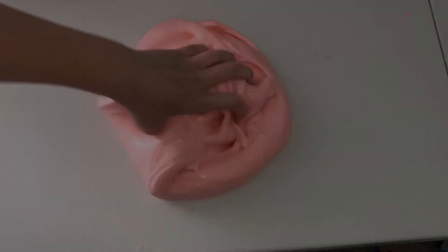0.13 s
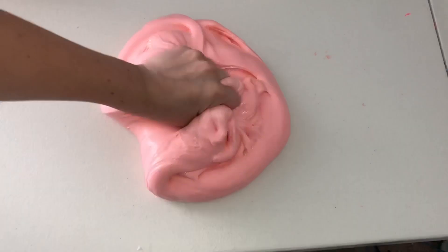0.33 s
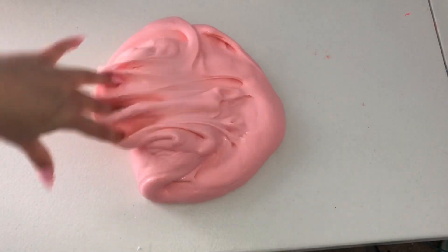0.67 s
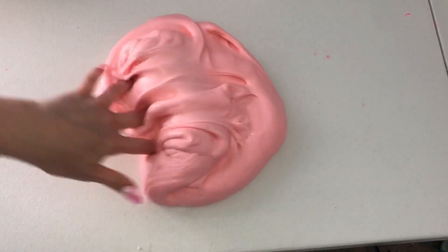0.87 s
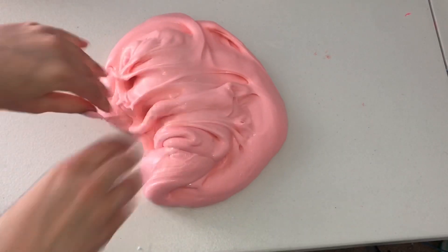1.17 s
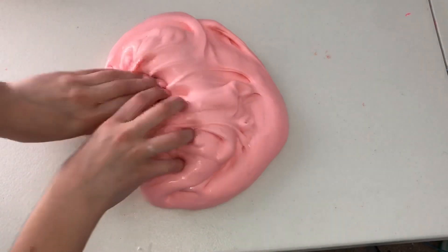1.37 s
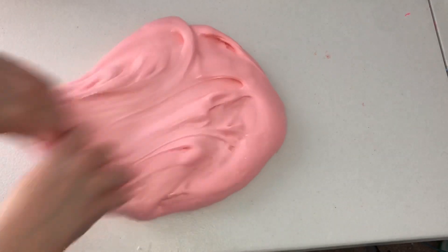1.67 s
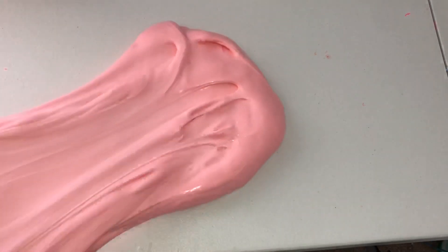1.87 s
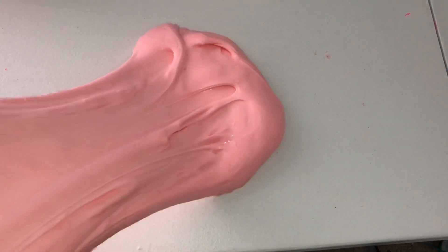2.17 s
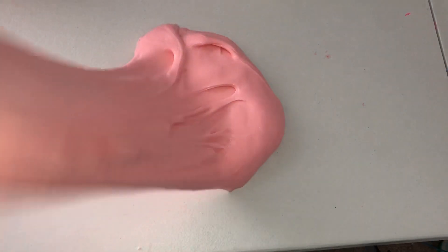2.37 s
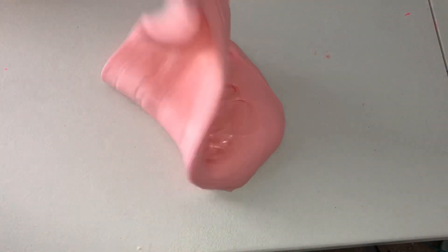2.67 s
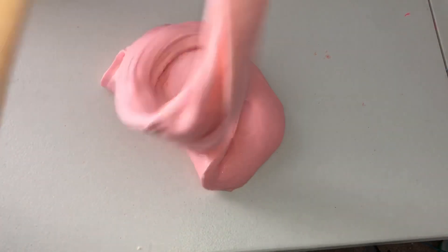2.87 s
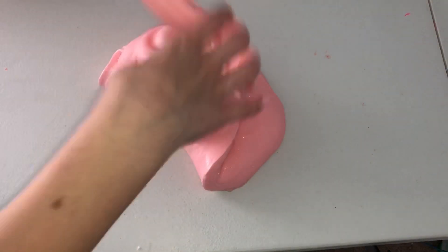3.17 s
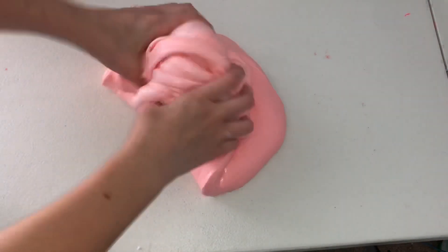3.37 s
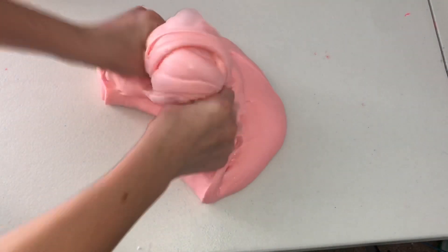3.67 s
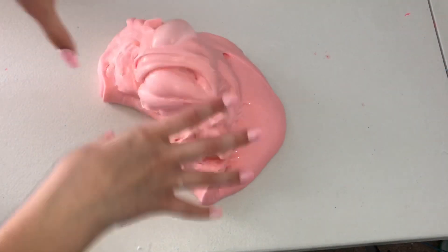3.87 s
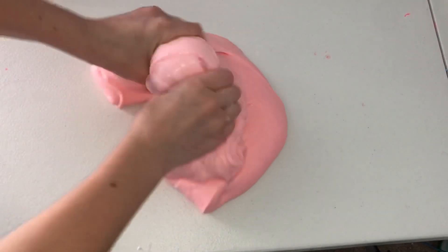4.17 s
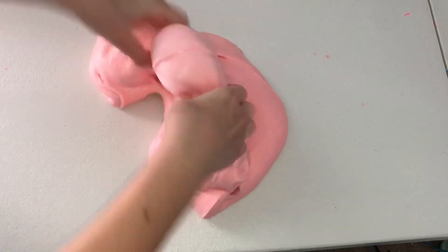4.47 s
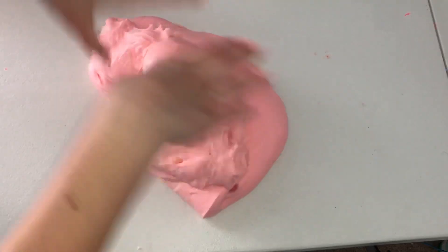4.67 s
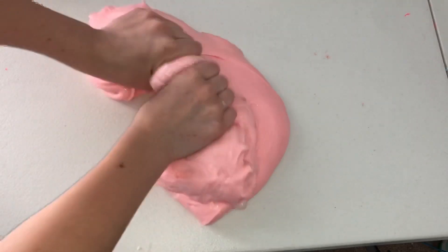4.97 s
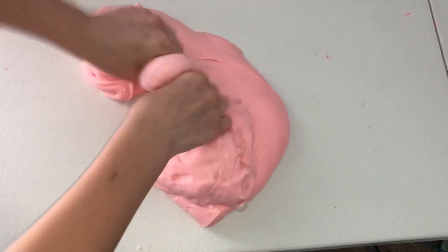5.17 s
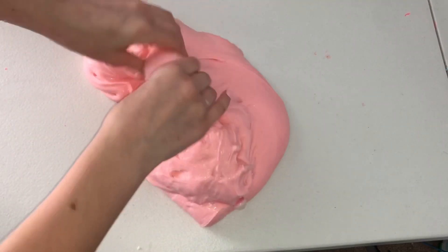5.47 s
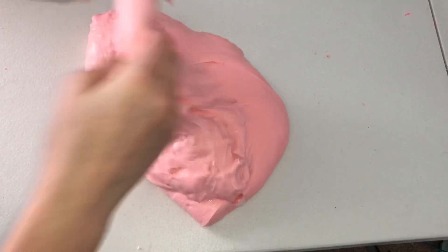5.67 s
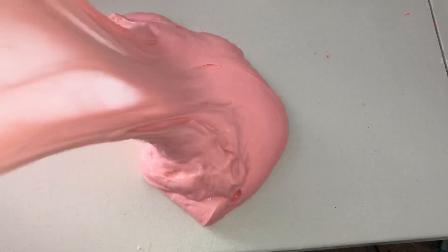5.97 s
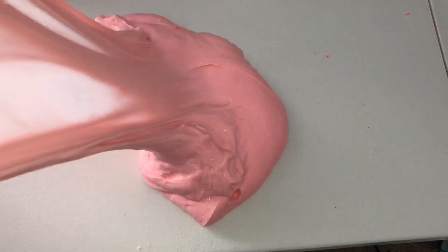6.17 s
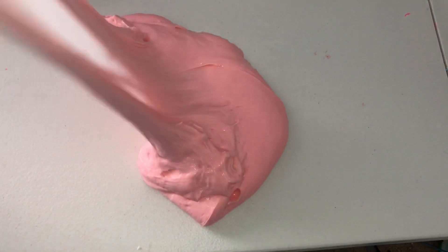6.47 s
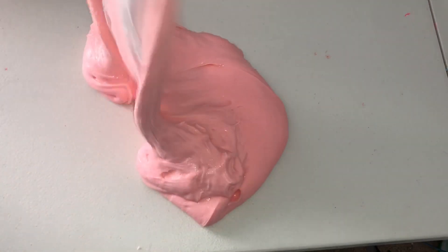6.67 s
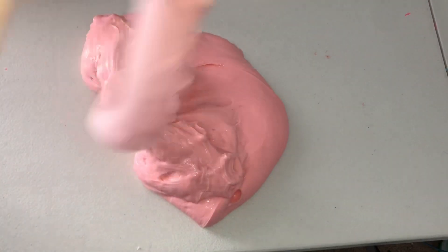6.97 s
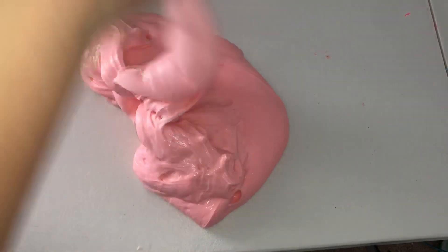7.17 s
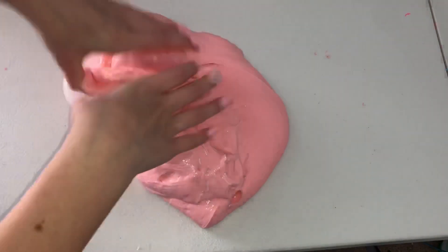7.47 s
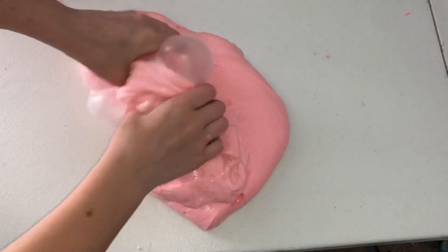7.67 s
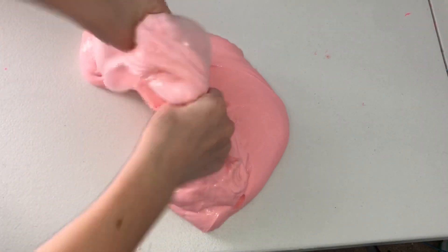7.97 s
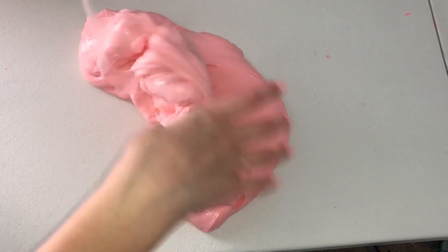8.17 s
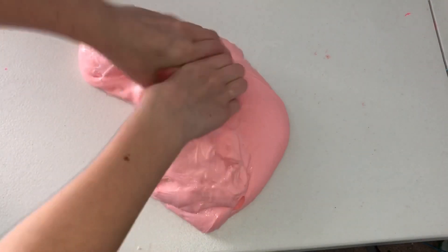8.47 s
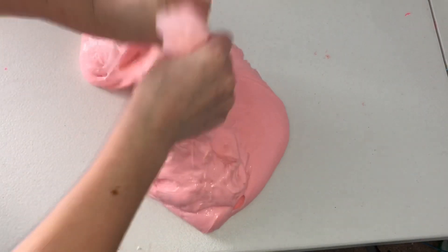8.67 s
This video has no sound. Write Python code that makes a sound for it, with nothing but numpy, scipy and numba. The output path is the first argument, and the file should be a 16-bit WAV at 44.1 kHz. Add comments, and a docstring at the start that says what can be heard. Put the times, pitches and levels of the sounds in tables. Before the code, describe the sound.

In a small quiet room, hands press and stretch foamy slime on a table, close to the microphone. Scattered small pops and soft squishes come first, then a sharp snap and a dense run of sticky crackles with dull thuds. The sound nearly stops while the slime is pulled, then two more clusters of loud pops follow. Faint room air and a low hum lie underneath.

```python
"""In a small quiet room, hands knead and stretch foamy slime on a table, close to a phone.
Trapped air pockets burst and ring as damped resonators, and the many tiny cells of the squeezed
foam add up to a crackle. Pushes excite the modes of the table top, and the slime squeaks once, faintly.
Table and walls reflect the bursts and thumps over faint room air, a hum and a drone;
the phone delays the bass more than the treble."""
import sys
import numpy as np
from scipy import signal
from scipy.fft import rfft, irfft, next_fast_len
from scipy.io import wavfile
from scipy.ndimage import uniform_filter1d
from numba import njit

SR = 44100
rng = np.random.default_rng(int(sys.argv[2]) if len(sys.argv) > 2 else 0)


def dump_mix(stems):
    """Bounce the given channels to the path in sys.argv[1] as a 16-bit WAV at rate SR."""
    frames = np.atleast_2d(stems).T  # one column per channel
    limited = np.clip(frames, -1, 1)  # hard clip at full scale
    pcm = np.round(limited * 32767).astype(np.int16)
    wavfile.write(sys.argv[1], SR, pcm)


N = 388962
T = np.arange(N) / SR


# Bursting air pockets: (time [s], peak level [dB], pitch [Hz], snap level [dB], blow level [dB])
POCKETS = [(0.258, -28, 5540, -53, -47), (0.313, -23.5, 6700, -44, -52), (0.346, -8, 9900, -35, -42),
           (0.391, -21, 9040.0, -35, -47), (0.455, -36, 6120, -39, -59), (0.48, -47, 9100, -18.5, -48),
           (0.569, -35.5, 1570, -34, -39), (0.785, -45, 9740.0, -38, -62), (0.864, -25, 6450, -53, -46),
           (0.994, -40.5, 3970, -63, -54), (1.156, -26, 3700.0, -30.5, -27), (1.411, -29, 2570.0, -37, -35),
           (1.432, -23.5, 3150, -33, -35.5), (1.624, -24.5, 3700, -46, -62), (2.066, -48, 5600, -42.5, -67),
           (2.29, -37.5, 4070.0, -61, -64), (2.334, -50, 5980.0, -38.5, -54),
           (2.366, -49.5, 1200, -52, -85), (2.606, -37.5, 2110, -44, -42), (2.718, -41, 3040.0, -38, -72),
           (2.841, -23, 1210, -28.5, -33), (2.878, -24, 1220, -41, -33.5), (3.177, -40, 1150, -70, -54),
           (3.314, -31.5, 1600, -36.5, -46), (3.335, -32, 1100, -52, -54), (3.427, -33.5, 1200, -47, -40),
           (3.483, -33, 9050.0, -33, -43), (3.534, -2, 1070, -13.5, -24), (3.581, -34, 1320.0, -24, -40),
           (3.601, 8, 5470, -1.5, -29), (3.603, 2.5, 7960, -18, -56), (3.697, -39, 4760.0, -33, -64),
           (3.719, -39, 1470, -55, -58), (3.796, -25, 3800, -56, -30), (3.838, -24, 1560, -43, -33),
           (3.93, -31.5, 4330, -37, -58), (3.992, -40.5, 3610.0, -38.5, -54),
           (4.052, -44.5, 5030, -49.5, -63), (4.163, -37, 8320.0, -38, -53.5),
           (4.194, -17.5, 9550.0, -21, -40), (4.24, -16.5, 2350, -31, -34), (4.268, -2, 5830, -31, -26.5),
           (4.312, 2.5, 2300, -3, -14), (4.351, -5.5, 6350, -14, -20), (4.358, -13, 1190, -13, -56),
           (4.381, -12, 4580.0, -11.5, -27), (4.426, -22, 10900.0, -14.5, -57),
           (4.488, -30, 3420, -35, -60), (4.513, -27, 5000, -37, -55), (4.544, -22.5, 2850, -39, -54),
           (4.666, -31.5, 4570, -40.5, -46), (4.813, -16, 11200, -19, -50),
           (4.913, -20.5, 3600, -34.5, -35), (4.957, -30, 3500.0, -38, -45), (4.98, -7.5, 1820, -37, -32),
           (4.99, -23, 1980.0, -16.5, -35), (5.013, -9.5, 2480, -14.5, -20.5), (5.03, -10, 6200, -18, -43),
           (5.043, 8, 2240, -12, -13), (5.063, -1, 6060, -10, -40), (5.117, -9, 6440.0, -23, -34),
           (5.127, -22, 5260.0, -36, -47.5), (5.149, -4, 6720, -42, -58), (5.174, -15.5, 6340.0, -26, -58),
           (5.182, -20, 7350.0, -26, -52), (5.19, -21, 8650.0, -9.5, -52), (5.272, -19, 3320.0, -28, -36),
           (5.356, -29.5, 1200, -35, -44), (5.517, -37.5, 2460, -38, -67.5),
           (5.559, -31, 9400.0, -29, -47.5), (5.595, -38.5, 8840.0, -38, -57),
           (5.834, -30.5, 9900, -52, -57), (5.899, -36, 3530, -29.5, -65.5),
           (6.077, -42.5, 1126, -39, -49.5), (6.392, -44.5, 2760, -53.5, -47),
           (6.767, -19.5, 1550, -29.5, -42.5), (6.857, -33.5, 1680.0, -39, -50.5),
           (6.888, -39.5, 1410.0, -59, -60), (6.997, -38.5, 1156, -46.5, -54),
           (7.009, -34, 1887, -53.5, -51), (7.025, -32.5, 4400, -47.5, -51),
           (7.325, -44.5, 1225, -59.5, -59.5), (7.408, -52, 1306, -58, -65),
           (7.463, -50.5, 1103, -57.5, -65), (7.654, -48, 2220, -45, -59.5), (7.788, -35, 3090, -41, -47.5),
           (7.855, 0.5, 2520, -15.5, -19), (7.868, -0.5, 7350, -31, -22), (7.888, -4.5, 4670, -20, -38),
           (7.923, -4.5, 5770, -17, -30), (7.94, -20, 1100, -45, -27.5), (7.951, -15, 10600.0, -16, -36),
           (7.988, -21, 10900.0, -27, -66), (8.006, -19, 11000, -28, -63), (8.061, -26.5, 6390.0, -31, -45),
           (8.158, -26, 8840, -29.5, -54), (8.365, -36, 6900, -47.5, -53.5), (8.545, -45, 3980, -48, -60),
           (8.564, -25.5, 4040, -45, -42.5), (8.595, -9.5, 1370, -26.5, -31), (8.604, 1, 1550, -48, -15),
           (8.615, -28, 2589, -20, -41), (8.639, -9.5, 2800.0, -34, -36), (8.641, -3, 1360, -50, -11),
           (8.684, -21.5, 1690, -37, -32), (8.74, -17, 9200, -17.5, -33), (8.795, -30.5, 1110, -38, -47),
           (8.801, -11, 11300.0, -25, -54)]
def pops(travel_s=.0016):
    """Cavity resonance: a bursting pocket rings, its skin snaps and the blow enters the table."""
    time, db, hz, snap_db, blow_db = np.transpose(POCKETS)
    onset = samples(time + travel_s)
    chance = rng.random((len(time), 32)).T
    # Smaller pockets and gentler bursts ring for more cycles.
    ring_cycles = .21 * (hz / 3000) ** .25 * 2 ** (-(db + 20.5) / 60)
    bursts = grains(onset, hz, ring_cycles, db)
    bursts += grains(onset, hz, cycles=1.1, db=db - 16)  # the emptied pocket rings on
    for k, (late, pitch) in enumerate(chance[:8].reshape(4, 2, -1)):
        tear = onset + samples(min(k, 1) * late * .003)  # the skin tears raggedly
        bursts += grains(tear, hz=5500 + 7000 * pitch, cycles=.31, db=snap_db - k)
    # Weaker cells nearby follow, each at its own pitch.
    for late, pitch, softness in chance[8:].reshape(8, 3, -1):
        cell_hz = np.minimum(hz * 2 ** (2.2 * pitch - .8), .35 * SR)
        cell_db = db - 12 - 15 * late - 6 * softness
        bursts += grains(onset + samples(late * .014), cell_hz, cycles=.39, db=cell_db)
    blow = grains(onset, hz=360, cycles=.24, db=blow_db)
    bass_cut = signal.butter(4, 110, "high", fs=SR, output="sos")  # soft slime radiates no deep bass
    return signal.sosfilt(bass_cut, bursts + .3 * blow + table_top(blow))


def foam(count, lo_hz, hi_hz, scatter_db):
    """Shot noise: tiny cells burst at random times, most weakly, a few strongly."""
    when, pitch, chance = rng.random((count, 3)).T
    hz = lo_hz * (hi_hz / lo_hz) ** pitch
    cells = grains((when * N).astype(np.int64), hz, cycles=.41, db=-scatter_db * np.log(1 - chance))
    return level(cells, 0)


# Gentle pulling and folding: (time [s], crackle level [dB])
HANDLING = [(0, -98), (0.27, -76), (0.75, -77), (1.3, -80), (1.9, -76), (2.5, -75), (3.1, -79.5),
            (4.0, -74.5), (4.75, -79), (5.45, -79.5), (6.0, -72.5), (6.3, -81), (6.7, -77.5), (7.2, -86.5),
            (8.4, -83), (8.82, -78)]
# Squeezes, silent unless the end follows the start:
# (start [s], fullest [s], end [s], crackle [dB], rasp [dB], fizz [dB], weight on the table [dB])
SQUEEZE_SWELLS = [(0.232, 0.29, 0.53, -66, -69, -66, -73), (0.502, 0.6, 0.7, -61, -58, -57.5, -56),
                  (1.115, 1.141, 1.27, -65, -59.5, -56, -48.5), (1.399, 1.44, 1.568, -50, -45.5, -57, -48),
                  (1.567, 1.66, 1.93, -63, -65, -66, -63.5), (2.583, 2.6, 3.04, -65, -73, -73, -71),
                  (2.767, 2.887, 2.94, -56.5, -61, -65, -56), (3.294, 3.49, 3.51, -59.5, -61, -64, -58.5),
                  (3.53, 3.623, 3.8, -56.5, -55, -52.5, -59), (3.76, 3.826, 3.97, -53.5, -51, -49.5, -49),
                  (4.163, 4.27, 4.3, -58.5, -61.5, -64, -62), (4.318, 4.322, 4.47, -41.5, -41, -36, -44.5),
                  (4.49, 4.54, 4.683, -55.5, -51.5, -49.5, -48.5),
                  (4.898, 5.065, 5.32, -56.5, -56.5, -66, -57), (5.224, 5.285, 5.4, -55, -53, -48.5, -51.5),
                  (5.52, 5.619, 5.97, -68, -74, -71.5, -67), (6.76, 6.846, 7, -68.5, -67, -70.5, -76),
                  (6.968, 7.022, 6.68, -58.5, -62, -63, -61), (7.614, 7.716, 7.9, -75.5, -75, -69.5, -70.5),
                  (7.844, 7.876, 8.04, -47.5, -46.5, -51, -64), (8.032, 8.086, 8.255, -56, -56, -52, -59),
                  (8.588, 8.61, 13, -53.5, -54.5, -48.5, -54), (8.672, 8.74, 8.67, -47, -47, -43, -50.5)]
def kneading():
    """Incoherent addition: handling and squeezes sum in power to drive the foam and the table."""
    db = np.interp(T, *np.transpose(HANDLING))
    power = undb([db, db, db + 1, -73 + .4 * (db + 75.5)]) ** 2
    for start, fullest, end, *peak_db in SQUEEZE_SWELLS:
        span = slice(int(start * SR), int(end * SR))
        swell = np.sin(np.pi / 2 * np.interp(T[span], [start, fullest, end], [0, 1, 0])) ** 1.59
        power[:, span] += (undb(peak_db)[:, None] * swell) ** 2
    crackle, rasp, fizz, weight = np.sqrt(power)
    patches = walk(60)  # the three foam bands flicker together
    crackle *= undb(4.6 * patches) * foam(count=14000, lo_hz=650, hi_hz=2300, scatter_db=2)
    rasp *= undb(2.9 * patches) * foam(count=18000, lo_hz=2620, hi_hz=5800, scatter_db=2.5)
    fizz *= undb(2.6 * patches) * foam(count=40000, lo_hz=5140, hi_hz=15500, scatter_db=3.5)
    shove = table_top(rng.standard_normal(N)) + .18 * band(rng.standard_normal(N), 150, 680)
    weight *= undb(3.6 * walk(29)) * level(shove, 0)
    return crackle + rasp + fizz + weight


# Modes of the table top: (frequency [Hz], bandwidth [Hz], gain [dB])
TABLE_MODES = [(153.3, 15, 9.5), (340, 84, -4), (421, 60, -1.5)]
def table_top(push):
    """Modal superposition: the response to a push is a sum of damped resonances."""
    return sum(undb(db) * band(push, hz - width / 2, hz + width / 2, order=1)
               for hz, width, db in TABLE_MODES)


# The heel of a hand lands through the slime: (time [s], level [dB])
HAND_LANDINGS = [(0.606, -38), (1.174, -26), (1.452, -54), (2.852, -40.5), (3.545, -27.5), (3.841, -35),
                 (4.326, -40.5), (4.577, -39.5), (4.912, -39.5), (5.051, -37.5), (5.306, -36),
                 (8.642, -38.5)]
def thuds():
    """Soft impact: a long push excites the table's lowest mode and rocks it on its legs."""
    time, db = np.transpose(HAND_LANDINGS)
    flexing = grains(samples(time), hz=TABLE_MODES[0][0], cycles=.74, db=db)
    rocking = grains(samples(time), hz=80, cycles=.56, db=db - 15)
    return flexing + rocking


def squeak(start_s=5.55, fullest_s=5.58, end_s=5.92, sag_hz_per_s=151.5):
    """Frequency modulation: pulled slime sounds a wavering, sagging tone and its subharmonic."""
    hz = 1110.5 - sag_hz_per_s * (T - start_s) + 16.1 * walk(32)
    phase = 2 * np.pi * np.cumsum(hz) / SR
    envelope = np.interp(T, [start_s, fullest_s, end_s], [0, 1, 0]) * undb(-73 + 3 * walk(25))
    return envelope * (np.sin(phase) + undb(2) * np.sin(phase / 2))


# Echoes from nearby surfaces: (delay [s], gain [dB])
REFLECTIONS = [(.0032, -15.5), (.0065, -26.5), (.0098, -24.5), (0.0121, -24.5)]
def room(sound, low_t60_s=.24, high_t60_s=.2, tail_db=-11):
    """Reverberation: early reflections and a diffuse tail whose treble decays first."""
    t = T[:SR // 2]
    low = band(rng.standard_normal(len(t)), 53, 1800) * undb(-60 * t / low_t60_s)
    high = band(rng.standard_normal(len(t)), 2400, 13000) * undb(-60 * t / high_t60_s)
    response = (.87 * low + high) * np.minimum(t / .00071, 1)
    response *= undb(tail_db) / np.sqrt(np.sum(response ** 2))
    response[0] = 1  # direct sound
    for delay, db in REFLECTIONS:
        response[int(delay * SR)] += undb(db)
    return signal.fftconvolve(sound, response)[:N]


# Spectrum of the room air: (frequency [Hz], relative spectral density [dB])
AIR_SPECTRUM = [(29, -34), (50, 3.5), (141, 0), (193, -6), (240, -4.5), (306, -11.5), (661, -22),
                (1050, -23), (2440, -29.5), (11100, -32.5), (16000, -37.5)]
def room_air():
    """Stationary noise: a steady rush with its greatest density in the bass."""
    hz, db = np.transpose(AIR_SPECTRUM)
    f = np.arange(N // 2 + 1) * SR / N + 1e-9
    colour = undb(np.interp(np.log(f), np.log(hz), db))
    return level(irfft(rfft(rng.standard_normal(N)) * colour, N), db=-64)


def mains_hum(hz=242.7, db=-71):
    """Amplitude modulation: a pure tone wavers slightly in level."""
    return np.sqrt(2) * undb(db + 1.5 * walk(5)) * np.sin(2 * np.pi * hz * T)


# Contour of the low drone: (time [s], level [dB])
DRONE_LEVELS = [(0.0, -57), (0.76, -57), (1.25, -57.5), (2.11, -76), (2.53, -63.5), (2.77, -56),
                (3.17, -67.5), (4.67, -64), (5.7, -71), (6.29, -68), (8.82, -83)]
def drone():
    """Random modulation: a low tone wanders in pitch and level."""
    hz = 54 + 8.2 * walk(7.7)
    db = np.interp(T, *np.transpose(DRONE_LEVELS)) + 2.1 * walk(9.8)
    return undb(db) * np.sin(2 * np.pi * np.cumsum(hz) / SR)


def grains(onset, hz, cycles, db):
    """Damped oscillation: each grain's envelope peaks at db after the given cycles, then decays."""
    return sum_grains(*np.broadcast_arrays(onset, hz, cycles, undb(db)))


@njit
def sum_grains(onset, hz, cycles, peak):
    """Linear superposition of sinusoids under envelopes t exp(-t / tau)."""
    out = np.zeros(N)
    for k in range(len(onset)):
        tau = cycles[k] * SR / hz[k]
        pole = np.exp(2j * np.pi * hz[k] / SR - 1 / tau)
        net = pole / (1 - pole) ** 2
        phasor = peak[k] * np.e / tau * abs(net) / net  # this phase moves no net air
        for i in range(min(N - onset[k], int(9 * tau) + 2)):
            out[onset[k] + i] += i * phasor.imag
            phasor *= pole
    return out


def walk(rate_hz):
    """Linear interpolation between random values of unit spread."""
    step = int(SR / rate_hz)
    return uniform_filter1d(np.repeat(rng.standard_normal(N // step + 1), step), step)[:N]


def band(x, lo_hz, hi_hz, order=2):
    """Butterworth band-pass."""
    return signal.sosfilt(signal.butter(order, [lo_hz, hi_hz], "band", fs=SR, output="sos"), x)


def samples(seconds):
    return (seconds * SR).astype(np.int64)


def undb(db):
    return 10 ** (np.asarray(db) / 20)


def level(x, db):
    return x * undb(db) / np.sqrt(np.mean(x ** 2))


def scene():
    """Superposition: slime and table sound through the room; background and squeak add directly."""
    slime = room(pops() + kneading() + thuds())
    return (slime + room_air() + mains_hum() + drone() + squeak())[None]


def record(dry, lag_cycles=1.7, lag_fade_hz=2600, bass_cut_hz=30, clip=.74, top_hz=15900):
    """Group delay: the phone lets low pitches lag; it also cuts deep bass, clips and cuts the top."""
    size = next_fast_len(N + SR // 2)
    f = np.maximum(np.arange(size // 2 + 1) * SR / size, 1.)
    lag = np.exp(-2j * np.pi * lag_cycles * np.log(np.maximum(f, 30.) / (f + lag_fade_hz)))
    high_pass = 1 / np.sqrt(1 + (bass_cut_hz / f) ** 8)
    lagged = irfft(rfft(dry, size) * lag * high_pass, size)[:, :N]
    low_pass = signal.ellip(10, .2, 70, top_hz, fs=SR, output="sos")
    return signal.sosfilt(low_pass, np.clip(lagged, -clip, clip))


dry = scene()
out = record(dry)
dump_mix(out)
```